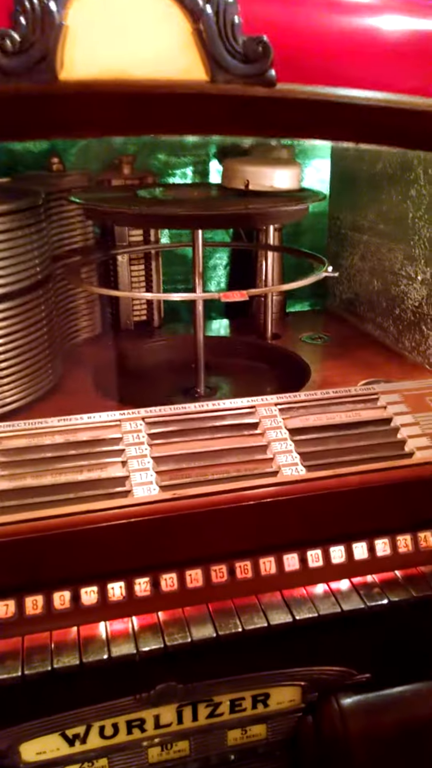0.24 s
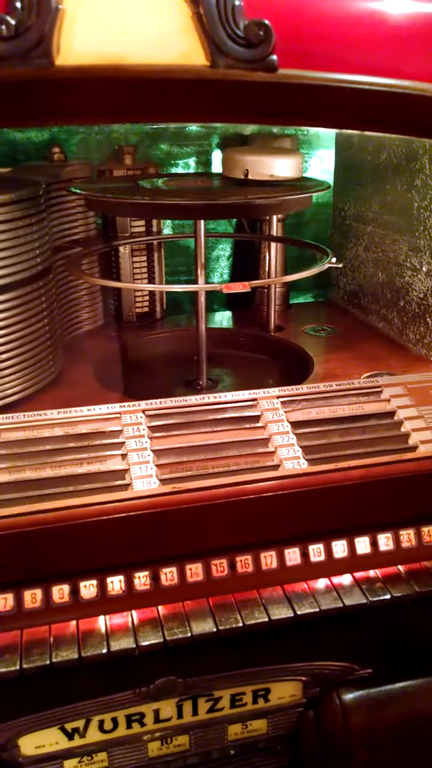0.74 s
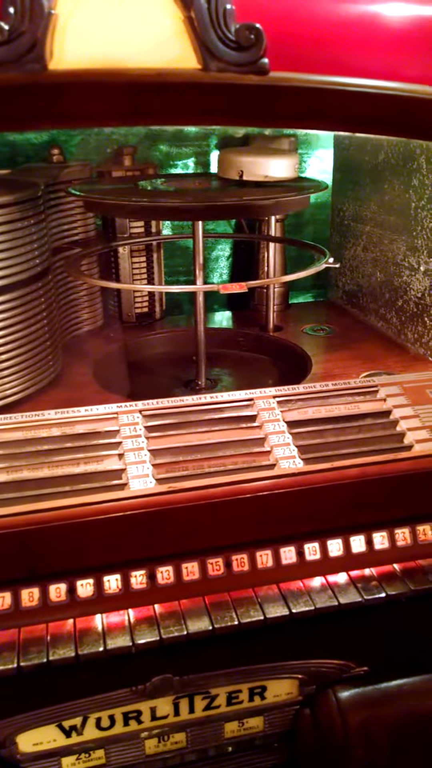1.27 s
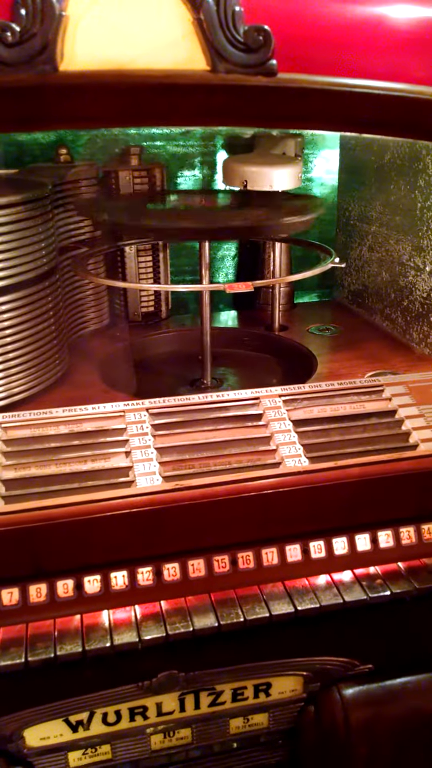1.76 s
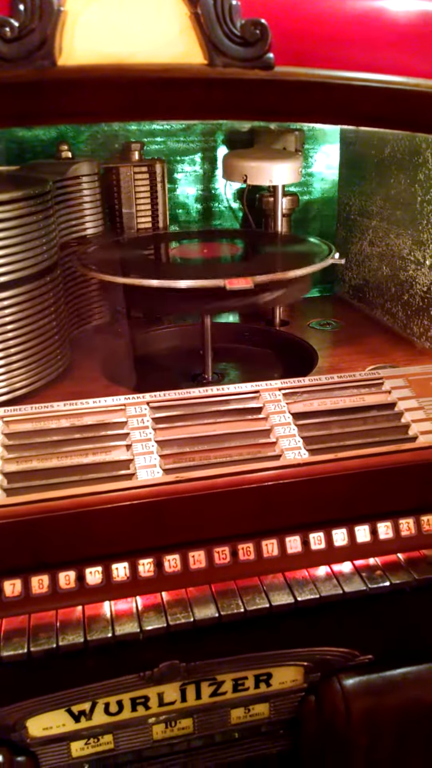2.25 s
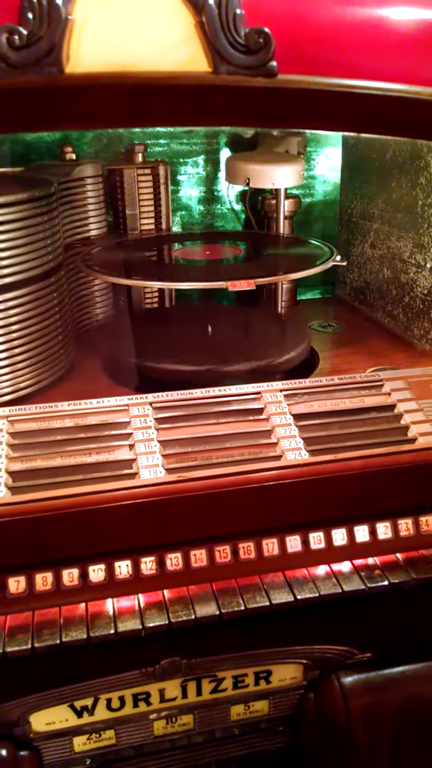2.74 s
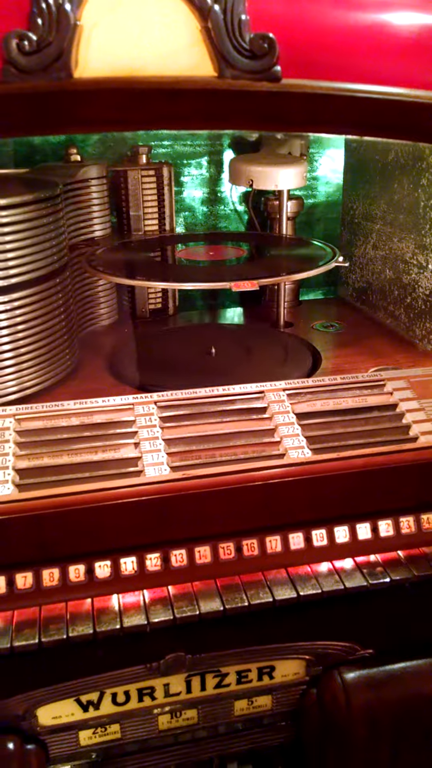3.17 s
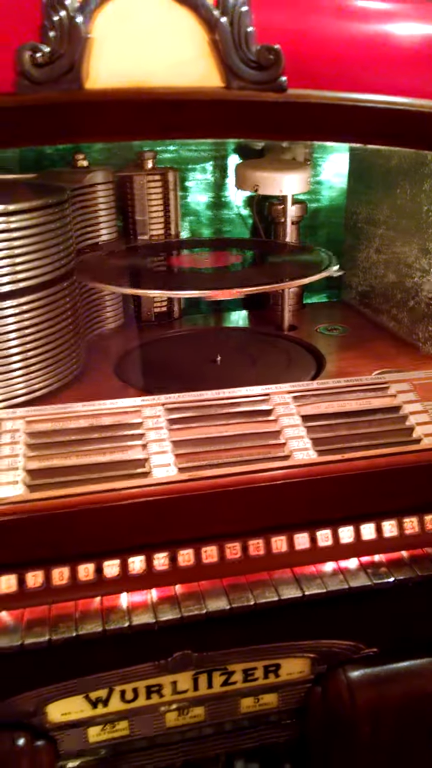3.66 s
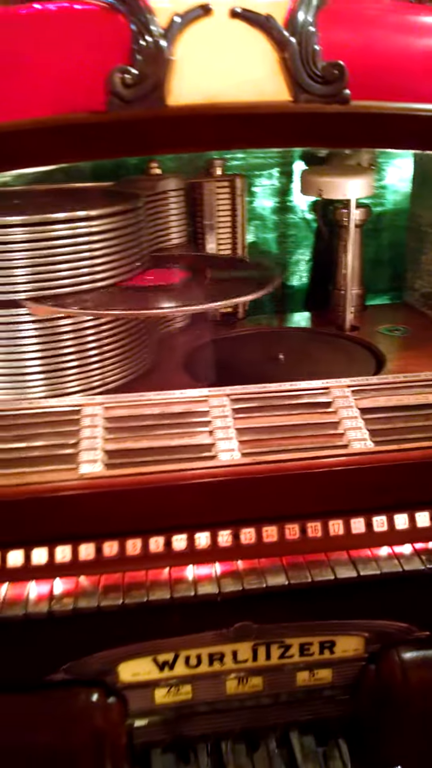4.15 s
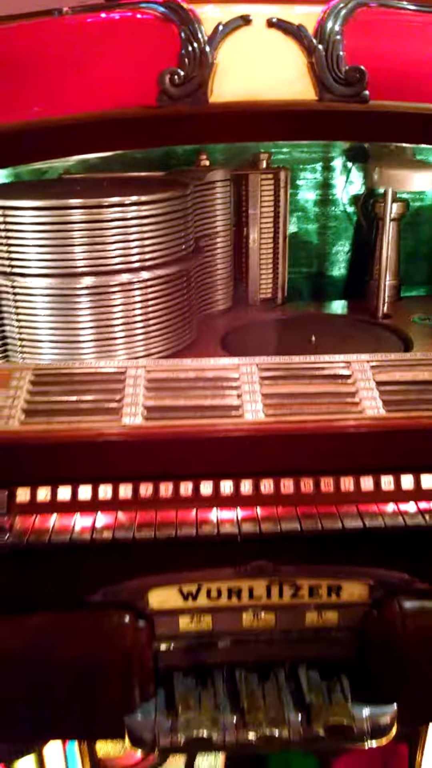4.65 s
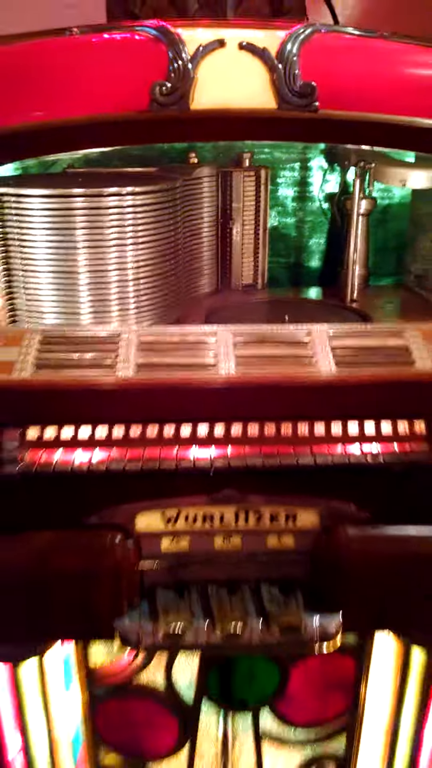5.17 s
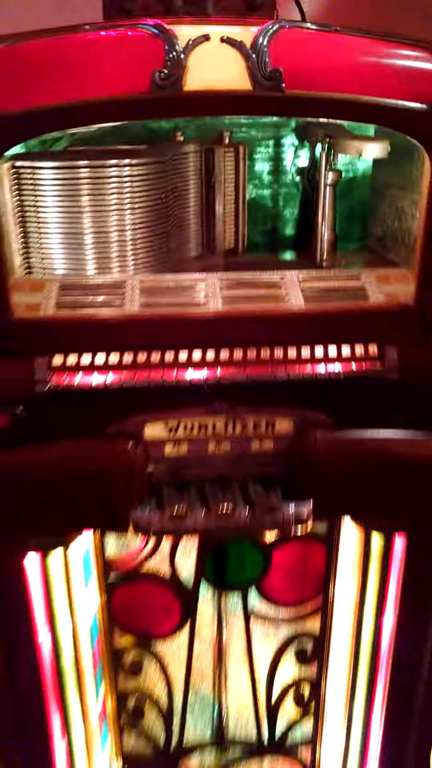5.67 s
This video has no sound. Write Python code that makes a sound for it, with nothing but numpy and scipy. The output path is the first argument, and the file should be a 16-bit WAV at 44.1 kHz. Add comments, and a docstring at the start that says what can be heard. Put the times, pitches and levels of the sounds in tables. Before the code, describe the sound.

A jukebox puts a record away: crackly groove noise stops after deep thumps, leaving motor hum, gear whirr, small metallic clicks and tray knocks.

```python
"""A jukebox changes its record close by: levers and latches drag, snap and ring as damped steel modes,
and the record tray knocks and rubs as cams swing it back into the stack.
Resonant noise is the needle in the run-out groove; its jolts boom in the loudspeaker until the turntable sinks away.
Behind lie mains harmonics, a turntable drone that beats with them, the gear whirr and a faint bearing squeak.
The hand-held stereo microphone adds hiss, handling rumble and thuds; a short diffuse room follows the blows."""
import sys
import numpy as np
from scipy import signal
from scipy.fft import rfft, irfft, next_fast_len
from scipy.io import wavfile
from scipy.ndimage import map_coordinates

SR = 44100
rng = np.random.default_rng(int(sys.argv[2]) if len(sys.argv) > 2 else 0)


def dump(signal):
    """Clip the signal to [-1, 1] and save it as 16-bit WAV at the path in sys.argv[1]."""
    limited = np.clip(np.atleast_2d(signal).T, -1, 1)
    pcm = np.round(limited * 32767).astype(np.int16)
    wavfile.write(sys.argv[1], SR, pcm)


N = 260631

# Microphone and room
# jostles of the hand-held microphone: start_s, sway_db, thud_db
JOSTLES = [(0.249, -40, -53), (2.201, -32.5, -47), (4.225, -47, -44), (4.32, -37, -29.5), (4.375, -43, -36),
           (4.656, -34, -35), (4.851, -39, -43), (4.902, -46, -36.5), (4.991, -33, -33), (5.03, -35, -33.5),
           (5.09, -37, -43), (5.185, -54, -39.5), (5.24, -36.5, -50), (5.641, -52, -37),
           (5.736, -41, -37.5)]
# spectrum of a handling thud: freq_hz, density_db (per Hz, relative)
THUD_SPECTRUM = [(25, -16), (55, -1), (95, 4.0), (180, -10), (450, -45.0)]
# left-right likeness of a handling thud: freq_hz, likeness (-1 to 1, beyond is clipped)
THUD_ALIKE = [(30, -1.0), (70, -1.3), (130, -0.34)]
# spectrum of handling rumble: freq_hz, density_db (per Hz, relative)
RUMBLE_SPECTRUM = [(15, -11), (30, 3), (60, -5.5), (100, -12), (200, -14.5), (600, -75)]
# left-right likeness of handling rumble: freq_hz, likeness (-1 to 1)
RUMBLE_ALIKE = [(30, -0.76), (55, -0.87), (90, -0.56)]
# spectrum of microphone hiss: freq_hz, density_db (per Hz, relative)
HISS_SPECTRUM = [(100, -21), (2000, -10), (5000, -3), (9500, 3.5), (12000, 1), (14300, 9), (15500, -0.5)]
# left-right likeness of most noises: freq_hz, likeness (-1 to 1)
ALIKE = [(100, 0.56), (600, 0.72), (1200, 0.46), (2000, 0), (3500, 0.072), (6000, 0), (15000, 0)]
# stereo widener: freq_hz, share of the opposite channel taken away (0 to 1, capped in use)
CROSSFEED = [(300, 0.12), (900, 0.16), (1500, 0.61), (2300, 0.93), (2750, 1), (5200, 0.45), (7800, 0.059),
             (10400, 0.16), (15000, 0.19)]
# decay of the room: freq_hz, t60_s
ROOM_DECAY = [(100, 0.16), (600, 0.25), (2000, 0.32), (6000, 0.21), (15000, 0.089)]

# Hum and running gear
# hum of motor and amplifier: mains_multiple, left_db, right_db
HUM_HARMONICS = [(1, -59, -56.5), (2, -47, -46), (3, -53, -49.5), (4, -66, -51), (5, -53, -57),
                 (7, -62, -55.5), (8, -60.5, -71), (10, -94, -103), (13, -82, -92), (15, -63, -93),
                 (18, -68, -75), (20, -69, -105)]
# amplifier buzz, muted with the needle: mains_multiple, level_db
BUZZ_HARMONICS = [(1, -76), (3, -81), (4, -66), (5, -64)]
# faint electrical whine: pitch_hz, level_db
WHINE_TONES = [(9650, -76), (14223, -81), (14463, -101)]
# drone of the free-running turntable: time_s, pitch_hz
TURNTABLE_PITCH = [(1.9, 129.03), (2.25, 137.04), (2.6, 136.42), (3.3, 125.72), (3.7, 129.68),
                   (4.4, 135.44), (4.95, 134.66), (5.4, 138.21), (5.9, 137.87)]
# spectrum of the gear whirr ahead of the panels: freq_hz, density_db (per Hz, relative)
WHIRR_SPECTRUM = [(40, -12), (90, -5.5), (200, -3.5), (350, -7), (620, -12), (1000, -15.5), (1450, -26),
                  (1950, -19), (2400, -32), (3000, -20.5), (3700, -27), (4600, -26.5), (9500, -28.5),
                  (15000, -35.5)]
# cabinet panels that the gear excites: freq_hz, width_hz, gain_db
PANELS = [(606, 134, 9), (760, 6.5, 14.5), (910, 6.1, 1), (1265, 140, 3.5), (1660, 23, 8.5),
          (1930, 57, 1.5)]
# cam strokes that load the gear: middle_s, length_s, rise_db
CAM_STROKES = [(1.225, 1.13, 4), (2.306, 0.85, 2), (3.495, 0.95, 1.5), (4.92, 0.36, 2)]
# faint squeaks of a dry bearing: peak_s, level_db
SQUEAKS = [(3.55, -68), (5.36, -70)]

# Needle and loudspeaker
# spectrum of needle noise ahead of the pickup: freq_hz, density_db (per Hz, relative)
NEEDLE_SPECTRUM = [(100, 0.5), (300, -8), (600, -5.5), (1000, -10), (1650, -6.5), (2200, -14), (3000, -8),
                   (3650, -7), (4400, -14), (5600, -6), (6800, -12), (8000, -22), (9500, -16.5),
                   (13000, -34)]
# resonances that colour needle noise: freq_hz, width_hz, gain_db
PICKUP = [(596, 15, 8.5), (988, 65, 10.5), (1374, 36, 8.5), (1658, 50, 6), (3450, 240, 2), (3700, 370, 7.5),
          (5450, 370, 8.5), (5650, 100, 3), (6600, 180, 1), (7080, 180, 7.5)]
# needle noise bands that waver independently: freq_hz, width_hz, depth_db (scales a random curve)
WAVERING_BANDS = [(1400, 900, 1), (3800, 800, 1.04), (5650, 1100, 0.8)]
# needle jolts heard through the loudspeaker: start_s, level_db, thump_db
BUMPS = [(0.92, -43.5, -38), (0.968, -53, -54), (1.263, -36.5, -37), (1.486, -27, -34), (1.501, -32, -26.5),
         (1.6695, -23, -18), (1.718, -38, -39), (1.735, -55, -32), (1.777, -52, -51)]
# spectrum of a jolt's thud: freq_hz, density_db (per Hz, relative)
JOLT_SPECTRUM = [(40, -42), (130, -13), (230, 4), (420, 0), (650, -4), (950, -15), (1600, -16), (2300, -24),
                 (8000, -63)]
# left-right likeness of a jolt's thud: freq_hz, likeness (-1 to 1)
JOLT_ALIKE = [(100, 1.0), (2000, 0.44)]
# loudspeaker in its cabinet: freq_hz, motion_db (relative), t60_s
SPEAKER_MODES = [(80, -6.5, 0.32), (91.8, 8, 0.11), (138, 4, 0.038), (177, -12, 0.11), (348, -32, 0.12)]
# loudspeaker box: freq_hz, motion_db (relative), t60_s
BOX_MODES = [(188.7, 5, 0.12), (252, -6.5, 0.048), (334, -7.5, 0.1), (402, -6.5, 0.086), (479, -12, 0.1),
             (596, -14, .045), (1384, -32, .04), (1747, -36, 0.1)]

# Tray, levers and latches
# dull knocks of tray and carrier: start_s, level_db, tilt_db (brightness per octave)
KNOCKS = [(1.644, -33.5, -10), (1.659, -33, 7), (4.649, -47, 5), (4.697, -56, 7), (4.782, -50, 21),
          (4.792, -49, 15), (4.842, -44.5, 17), (4.865, -49, 12), (4.907, -50, 10), (4.931, -50, 8),
          (4.973, -53, 14), (4.984, -46, 5), (4.995, -53, 4), (5.516, -46, -5), (5.528, -41, -18),
          (5.546, -48, -12)]
# tray rubs as it settles in the stack: peak_s (greatest pressure), level_db
RUBS = [(4.8, -57), (4.855, -50), (4.92, -63), (4.99, -57), (5.521, -47.5)]
# spectrum of the rub: freq_hz, density_db (per Hz, relative)
SCRAPE_SPECTRUM = [(80, -23), (200, -3), (400, 7), (650, -13), (1300, -9), (2200, -7), (5000, -13),
                   (15000, -25)]
# record tray: freq_hz, level_db (relative, before tilt), t60_s (before any further damping)
TRAY_MODES = [(570, 0, 0.1), (616, 3, 0.12), (708, -2, 0.088), (794, -9.5, 0.09), (940, -17, 0.061),
              (1184, -9.5, 0.057), (1375, -19, 0.076), (1740, -30.5, 0.1)]
# the tray's steel hoop takes the record, then is jerked aside: start_s, level_db, tilt_db (per octave)
HOOP_STRIKES = [(2.287, -42, 2.5), (2.298, -51, -9), (3.396, -47.5, 1)]
# the hoop: freq_hz, level_db (relative, before tilt), t60_s
HOOP_MODES = [(870, -9, .08), (1000, 2, 0.095), (1650, 1.5, 0.086), (1890, -2, 0.055), (3900, -23, 0.08),
              (5870, 2, 0.031)]
# a small steel latch seats: start_s, level_db, tilt_db (per octave)
LATCH_STRIKES = [(3.718, -55, 8), (4.682, -41, 0), (5.516, -54.5, 2)]
# the latch: freq_hz, level_db (relative, before tilt), t60_s
LATCH_MODES = [(815, -4, 0.13), (1700, -1.5, 0.035), (1917, 2.5, 0.062), (1980, 0.5, .03)]
# the trip lever snaps over and rebounds: start_s, level_db, tilt_db (per octave)
TRIP_STRIKES = [(1.3375, -26.5, 3.5), (1.3417, -30, -2.5)]
# the trip lever: freq_hz, level_db (relative, before tilt), t60_s
TRIP_MODES = [(1394, -4, 0.043), (1535, -13, .13), (1634, -7, .085), (1760, -8, 0.14), (1926, 2, 0.04),
              (2200, -3, .045), (2780, -6, 0.071), (4170, -17, 0.035), (6480, -7, 0.038)]
# levers and latches drag, then snap home: start_s, click_db, steel_db, cabinet_db, drag_s
CLACKS = [(1.11, -44, -60, -50, 0.0025), (1.12, -37, -38, -36.5, 0.0057), (1.128, -41, -38, -41, 0.003),
          (1.197, -43, -65, -45, 0.024), (1.3375, -30, -34.5, -29, 0.001), (1.635, -50, -43.5, -38, 0.0073),
          (1.644, -33.5, -44, -41, .004), (1.719, -68, -44.5, -47, 0.0071), (2.263, -49, -63, -43, 0),
          (2.274, -42, -63, -53, 0.0099), (2.283, -46, -65, -47, 0.02), (2.287, -40.5, -49, -43, 0),
          (2.298, -53, -47, -49, 0), (2.355, -43, -51, -45, 0.0038), (2.366, -59, -51, -51, 0),
          (3.391, -41, -49, -48, 0.00085), (3.396, -45.5, -53, -42, 0.0052),
          (3.718, -53, -76, -51, 0.00085), (4.532, -48, -58, -73, 0.0048), (4.634, -50.5, -58, -53, 0.0046),
          (4.682, -52, -50, -45, 0), (4.771, -36, -71, -53, 0), (4.779, -37, -62, -47, 0.012),
          (4.833, -37, -50, -41.5, 0.0077), (4.837, -42.5, -51, -48, 0.0097),
          (4.846, -55, -51, -43, 0.0065)]
# steel levers: freq_hz, level_db (relative), t60_s (before further damping)
STEEL_MODES = [(880, -5, 0.23), (1100, -6, .12), (1417, 0.5, 0.053), (1546, -3, 0.12), (1630, -0.5, 0.07),
               (1720, -3, 0.068), (1934, 5, 0.036), (2105, 1.5, 0.054), (2340, 0, 0.083),
               (2740, 3.5, 0.045), (5770, -2.5, 0.028), (6270, -3, 0.034)]
# spectrum of the contact click: freq_hz, density_db (per Hz, relative)
CLICK_SPECTRUM = [(800, -43), (2200, -0.5), (3200, -0.5), (4500, 0), (5700, 2.5), (6500, 3.5), (7600, 1),
                  (9300, 1), (11500, -5.5), (15000, -4)]
# spectrum of the wooden cabinet knock: freq_hz, density_db (per Hz, relative)
CABINET_SPECTRUM = [(25, -20), (60, 5), (120, 2.5), (330, 5), (650, 4), (950, -0.5), (1500, -13.5),
                    (3000, -52), (8000, -80)]

# Settings: _DB levels, _S and _T60 seconds, _HZ hertz
RUMBLE_DB, SWAY_T60 = -49, 0.3  # rumble at rest; its swell around a jostle
PORT_DELAY_S, TOP_HZ = .000386, 15650  # widener delay; upper limit of the band
MAINS_HZ = 60
MUTE_S = 1.8  # amplifier silent from here
HUM_FADE_S, HUM_FADE_DB_PER_S = 4.98, 3.5  # the hum grows fainter from here
MOTOR_HZ, MOTOR_DB, MOTOR_FADE_S, MOTOR_T60 = 1935, -68, 3.35, 4.3  # motor whine and its fade
DRONE_DB, DRONE_DB_PER_HZ, DRONE_RISE_S = -49, 0.2, 0.33  # level at mean pitch; faster is louder
GEAR_DB = -49  # without load
SQUEAK_HZ, SQUEAK_ARCH_HZ, ARCH_S, SQUEAK_T60 = 11350, 880, .07, 1.2
GROOVE_DB, GROOVE_FADE_DB_PER_S = -40, 4.5  # level at the start; fades as the needle runs inward
TURN_SWING_DB, TURN_PEAK_S, TURNS_PER_S = 0.7, 0.4, 78 / 60  # swell once a turn
LIFT_S, LIFT_T60 = 1.77, 0.19  # the needle leaves the groove
BUMP_T60, THUMP_DELAY_S = 0.087, 0.00677
RASP_DB, RASP_GROWS = -41.5, 0.37  # treble rasp of an average jolt; dB more for each dB of jolt
RUB_RISE_T60, RUB_FALL_T60 = 0.58, 0.37
CLACK_T60, STEEL_T60 = 0.083, 0.15  # click decay; extra damping of the levers
CLACK_RISE_S, FIRM_DB = 0.00063, -37  # closing time; steel struck harder than this closes faster
DRAG_DB = -1  # drag relative to its click
CRACK_DB, CRACK_T60 = -5.5, 0.0086  # first instant of a contact, relative to its click


def amp(db):
    """Amplitude of a level in decibels."""
    return 10 ** (np.asarray(db) / 20)


def unit(x):
    """Scales a signal to rms 1."""
    return x / np.sqrt(np.mean(x ** 2) + 1e-20)


def blow(x):
    """Scales a hit to rms 1 over its first 30 ms."""
    return x / np.sqrt(np.mean(x[..., :int(.03 * SR)] ** 2) + 1e-20)


def pan(db):
    """Left and right gains for a left-right level difference."""
    return amp([[db / 2], [-db / 2]])


def along(points, hz):
    """Reads (freq_hz, value) points along a log frequency axis."""
    freq, value = np.transpose(points)
    return np.interp(np.log(hz + 1), np.log(freq), value)


def since(s):
    """Seconds since the moment s, for each sample."""
    return np.arange(N) / SR - s


def fade(t, t60):
    """An exponential decay of 60 dB in t60 seconds, never quicker than 5 ms."""
    return np.exp(-np.log(1000) * t / np.maximum(t60, .005))


def swell(s, rise_t60, fall_t60):
    """An envelope that grows to 1 at s and dies away."""
    t = since(s)
    return fade(np.abs(t), np.where(t < 0, rise_t60, fall_t60))


def wobble(rate):
    """A smooth random curve, rate knots a second."""
    knots = rng.standard_normal(int(N * rate / SR) + 4)
    return map_coordinates(knots, [np.arange(N) * rate / SR])


def sine(hz):
    """A sine of rms 1 that follows a pitch curve in hertz."""
    return np.sqrt(2) * np.sin(2 * np.pi * np.cumsum(hz) / SR)


def filtered(x, response):
    """Multiplies the spectrum of x by a response of frequency."""
    n = x.shape[-1]
    m = next_fast_len(n + 8192)
    return irfft(rfft(x, m) * response(np.fft.rfftfreq(m, 1 / SR)), m)[..., :n]


def noise(spectrum, size=N, alike=ALIKE):
    """Coloured stereo noise of rms 1; the mid-side balance sets the left-right likeness."""
    def response(hz):
        angle = np.arccos(np.clip(along(alike, hz), -1, 1)) / 2
        return amp(along(spectrum, hz)) * [np.cos(angle), np.sin(angle)]

    mid, side = filtered(rng.standard_normal((2, size)), response)
    return unit(np.array([mid + side, mid - side]))


def peaks(rows, hz):
    """Gain of a set of (freq_hz, width_hz, gain_db) resonances."""
    return amp(sum(db / (1 + (2 * (hz - centre) / width) ** 2) for centre, width, db in rows))


def enclosed(x, depth_db, spacing_hz=38):
    """Dense standing waves of the cabinet ripple the spectrum above the low mids."""
    knots = rng.standard_normal(int(SR / spacing_hz) + 4)

    def response(hz):
        ripple = map_coordinates(knots, [hz / spacing_hz])
        return amp(depth_db * hz / (hz + 1200) * ripple)

    return filtered(x, response)


def ring(modes, t, scatter_db):
    """Damped modes, struck at new strengths and reaching each microphone port differently."""
    hz, db, t60 = np.transpose(modes)[:, :, None]
    strength = amp(db + scatter_db * rng.standard_normal((2, len(modes), 1)))
    phase = rng.uniform(0, 2 * np.pi, (len(modes), 1)) + .5 * rng.standard_normal((2, len(modes), 1))
    return np.sum(strength * fade(t, t60) * np.sin(2 * np.pi * hz * t + phase), axis=1)


def tilted(modes, tilt_db):
    """Favours the upper modes by tilt_db an octave above the first."""
    return [(hz, db + tilt_db * np.log2(hz / modes[0][0]), t60) for hz, db, t60 in modes]


def add(track, s, x):
    """Mixes x into the track at s seconds."""
    part = track[:, max(round(s * SR), 0):][:, :x.shape[-1]]
    part += x[..., :part.shape[-1]]


def floor():
    """Handling rumble, swelling at each jostle and nearly opposite at the two ports, over microphone hiss."""
    sway = amp(RUMBLE_DB) + sum(amp(db) * swell(s, SWAY_T60, SWAY_T60) for s, db, _ in JOSTLES)
    rumble = sway * amp(0.69 * wobble(25)) * noise(RUMBLE_SPECTRUM, alike=RUMBLE_ALIKE)
    hiss = amp(-56.0) * noise(HISS_SPECTRUM)
    return pan(2.0) * rumble + pan(2.4) * hiss


def jostles(t60=0.19, rise_s=0.003):
    """Each jostle thuds dully in the microphone as a short burst of bass noise."""
    track, t = np.zeros((2, N)), np.arange(SR // 3) / SR
    envelope = (1 - np.exp(-t / rise_s)) * fade(t, t60)
    for s, _, thud_db in JOSTLES:
        thud = noise(THUD_SPECTRUM, size=len(t), alike=THUD_ALIKE)
        add(track, s, amp(thud_db) * blow(thud * envelope))
    return track


def room(x):
    """A diffuse tail in which each frequency dies at its own speed."""
    hz, t, z = signal.stft(rng.standard_normal((2, SR // 2)), SR, nperseg=256)
    decay = fade(t, along(ROOM_DECAY, hz)[:, None])
    tail = signal.istft(z * decay, SR, nperseg=256)[1]
    tail = np.pad(tail / np.linalg.norm(tail[0]), ((0, 0), (int(.008 * SR), 0)))  # starts 8 ms late
    return signal.fftconvolve(x, tail, axes=1)[:, :N]


def hum(waver_db=1.5, flutter_db=1.3):
    """Mains harmonics from motor and amplifier, each slightly unsteady, and a faint high whine."""
    t = since(0)

    def tone(hz):
        unsteady_db = waver_db * wobble(3.76) + flutter_db * min(hz / 300, 1) * wobble(21.97)
        return np.sqrt(2) * amp(unsteady_db) * np.sin(2 * np.pi * hz * t)

    motor = sum(amp([[left], [right]]) * tone(k * MAINS_HZ) for k, left, right in HUM_HARMONICS)
    live = np.clip((MUTE_S - t) / .02, 0, 1)
    amplifier = live * sum(amp(db) * tone(k * MAINS_HZ) for k, db in BUZZ_HARMONICS)
    hum_fade = amp(-HUM_FADE_DB_PER_S * np.maximum(since(HUM_FADE_S), 0))
    whine = sum(amp(db) * tone(hz) for hz, db in WHINE_TONES)
    return hum_fade * motor + amplifier + whine


def motor_whine(waver_db=3.0):
    """A thin, unsteady motor tone that dies down once the turntable has sunk."""
    decay = fade(np.maximum(since(MOTOR_FADE_S), 0), MOTOR_T60)
    return amp(MOTOR_DB + waver_db * wobble(21.93)) * decay * sine(MOTOR_HZ + 18 * wobble(90))


def turntable():
    """A drone just above twice the mains frequency, so that it throbs against the hum."""
    time_s, pitch_hz = np.transpose(TURNTABLE_PITCH)
    hz = np.interp(since(0), time_s, pitch_hz)
    rise = np.clip(since(time_s[0]) / DRONE_RISE_S, 0, 1)
    level = amp(DRONE_DB + DRONE_DB_PER_HZ * (hz - hz.mean()))
    return pan(-1.8) * level * rise * sine(hz)


def gear(buzz=0.036):
    """The gear train whirrs through cabinet panels, pulsing with motor torque and louder under load."""
    load_db = sum(rise * np.cos(np.pi * np.clip(since(s) / length, -.5, .5))
                  for s, length, rise in CAM_STROKES)
    torque = 1 + buzz * np.sin(2 * np.pi * 2 * MAINS_HZ * since(0))
    whirr = filtered(noise(WHIRR_SPECTRUM), lambda hz: peaks(PANELS, hz))
    whirr = unit(enclosed(whirr, depth_db=2.8))
    return amp(GEAR_DB + load_db + 0.76 * wobble(8) + 1.27 * wobble(45)) * torque * whirr


def squeak(jitter_hz=35):
    """A bearing sings thinly, its pitch arching as the load passes."""
    arch = sum(np.exp(-(since(s) / ARCH_S) ** 2) for s, _ in SQUEAKS)
    hz = SQUEAK_HZ + SQUEAK_ARCH_HZ * arch + jitter_hz * wobble(120)
    level = sum(amp(db) * swell(s, SQUEAK_T60, SQUEAK_T60) for s, db in SQUEAKS)
    return level * amp(2 * wobble(30)) * sine(hz)


def wavering_bands(x, rate=70):
    """Three bands of the needle noise waver in level, each by its own random curve."""
    def band(centre, width):
        return filtered(x, lambda hz: np.exp(-(2 * (hz - centre) / width) ** 2))

    return x + sum((amp(db * wobble(rate)) - 1) * band(centre, width)
                   for centre, width, db in WAVERING_BANDS)


def groove(crackle_db=0.5, flutter_db=0.37, tick_rate=160, tick_size=2.6):
    """Grainy surface noise and dust ticks under the needle, coloured by the pickup's resonances."""
    turn_db = TURN_SWING_DB * np.cos(2 * np.pi * TURNS_PER_S * since(TURN_PEAK_S))
    db = GROOVE_DB - GROOVE_FADE_DB_PER_S * since(0) + turn_db + flutter_db * wobble(30.85)
    contact = fade(np.maximum(since(LIFT_S), 0), LIFT_T60)
    grit = rng.standard_normal((2, N)) * amp(crackle_db * wobble(300))
    ticks = (rng.random(N) < tick_rate / SR) * rng.exponential(1, N)
    grit[0] += tick_size * ticks  # the mid channel only
    mid, side = filtered(grit, lambda hz: amp(along(NEEDLE_SPECTRUM, hz)) * peaks(PICKUP, hz))
    hiss = wavering_bands(enclosed(np.array([mid + side, mid - side]), depth_db=4.5))
    return pan(3.6) * amp(db) * contact * unit(hiss)


def bumps(attack_s=0.0012, swell_s=0.0043, box_db=-1, box_rise_s=0.00072, thud_db=-5):
    """A needle jolt rasps in the loudspeaker and rings its box; the cone then booms at its bass resonance."""
    track, t = np.zeros((2, N)), np.arange(SR // 3) / SR

    def radiated(modes, rise_s):
        motion = sum(amp(db) * fade(t, t60) * np.sin(2 * np.pi * hz * t) for hz, db, t60 in modes)
        return blow(np.gradient(motion * (1 - np.exp(-t / rise_s))))  # the motion's rate of change

    thump = radiated(SPEAKER_MODES, swell_s)
    box = amp(box_db) * radiated(BOX_MODES, box_rise_s)
    burst = (1 - np.exp(-t / attack_s)) * fade(t, BUMP_T60)
    average_db = np.mean([db for _, db, _ in BUMPS])
    for s, db, thump_db in BUMPS:
        thud = amp(thud_db) * blow(noise(JOLT_SPECTRUM, size=len(t), alike=JOLT_ALIKE) * burst)
        scratch = filtered(noise(NEEDLE_SPECTRUM, size=len(t)), lambda hz: peaks(PICKUP, hz))
        rasp = amp(RASP_DB + RASP_GROWS * (db - average_db)) * blow(scratch * burst)
        add(track, s, pan(-4.5) * amp(db) * (thud + box) + rasp)
        add(track, s + THUMP_DELAY_S, pan(-6.5) * amp(thump_db) * thump)
    return track


def slide(chatter_db=3.5, rattle_db=-3.5, rattle_rate=70, rattle_tilt_db=10, held_t60=0.059):
    """The tray rubs unevenly on its guide and rattles against its neighbours, which damp it."""
    pressure = sum(amp(db) * swell(s, RUB_RISE_T60, RUB_FALL_T60) for s, db in RUBS)
    rub = amp(chatter_db * wobble(70)) * noise(SCRAPE_SPECTRUM)
    t = np.arange(SR // 8) / SR
    taps = (rng.random((1, N)) < rattle_rate / SR) * rng.standard_normal((1, N))
    held_tray = ring(tilted(TRAY_MODES, rattle_tilt_db), t, scatter_db=-3.0) * fade(t, held_t60)
    rattle = signal.fftconvolve(taps, held_tray, axes=1)[:, :N]
    return pan(2.4) * pressure * (rub + amp(rattle_db) * unit(rattle))


def struck(strikes, modes, length, attack_s, rattle_db, rattle_rate, pan_db):
    """Blows ring a part's modes with an uneven rattle; tilt favours the upper modes."""
    track, t = np.zeros((2, N)), np.arange(length) / SR
    for s, db, tilt_db in strikes:
        rattle = amp(rattle_db * wobble(rattle_rate)[:len(t)])
        tone = ring(tilted(modes, tilt_db), t, scatter_db=1.0) * rattle * (1 - np.exp(-t / attack_s))
        add(track, s, pan(pan_db) * amp(db) * blow(tone))
    return track


def knocks():
    """The tray rings briefly, rattling in its loose seat."""
    return struck(KNOCKS, TRAY_MODES, SR // 3, attack_s=0.00062, rattle_db=2, rattle_rate=280, pan_db=1.1)


def clinks(strikes, modes, rattle_db):
    """A loose steel part is struck and rings briefly; its tilt sets how bright the contact is."""
    return struck(strikes, modes, SR // 4, attack_s=0.00012, rattle_db=rattle_db, rattle_rate=276, pan_db=3.4)


def clacks(cabinet_t60=0.23, rattle_db=2):
    """Each contact drags, clicks, rings the levers and knocks the wooden cabinet."""
    track, t = np.zeros((2, N)), np.arange(SR // 3) / SR
    click_decay = fade(t, CLACK_T60) + amp(CRACK_DB) * fade(t, CRACK_T60)
    for s, click_db, steel_db, cabinet_db, drag_s in CLACKS:
        rise_s = CLACK_RISE_S * min(1, np.sqrt(amp(FIRM_DB - steel_db)))
        attack = 1 - np.exp(-t / rise_s)
        rattle = amp(rattle_db * wobble(320)[:len(t)])  # loose joints chatter as they close
        wood = noise(CABINET_SPECTRUM, size=len(t)) * attack * fade(t, cabinet_t60)
        steel = ring(STEEL_MODES, t, scatter_db=3.5) * attack * rattle * fade(t, STEEL_T60)
        click = noise(CLICK_SPECTRUM, size=len(t)) * attack * rattle * click_decay
        metal = amp(steel_db) * blow(steel) + amp(click_db) * blow(click)
        scuff = amp(click_db + DRAG_DB) * noise(CLICK_SPECTRUM, size=len(t)) * rattle * (t < drag_s)
        add(track, s, pan(0.44) * amp(cabinet_db) * blow(wood) + pan(3.3) * metal)
        add(track, s - drag_s, pan(5.2) * scuff)
    return track


def scene():
    """Levers, latch, tray and needle jolts sound in the room, over the running machine."""
    levers = clacks() + knocks() + clinks(HOOP_STRIKES, HOOP_MODES, rattle_db=7.0)
    latch = clinks(LATCH_STRIKES, LATCH_MODES, rattle_db=1.0)
    latch = latch + clinks(TRIP_STRIKES, TRIP_MODES, rattle_db=3.0)
    needle = bumps()
    echo = room(amp(-11.5) * levers + amp(-14.5) * latch + amp(-11.5) * needle)
    machine = hum() + motor_whine() + turntable() + gear() + squeak() + slide() + groove()
    return floor() + jostles() + machine + echo + needle + latch + levers


def record(dry):
    """The recorder widens the stereo by subtracting a delayed opposite channel, then limits the band."""
    def share(hz):
        return np.clip(along(CROSSFEED, hz), 0, .95)

    opposite = filtered(dry[::-1], lambda hz: share(hz) * np.exp(-2j * np.pi * hz * PORT_DELAY_S))
    # the division makes up for the power that the subtraction adds
    return filtered(dry - opposite, lambda hz: (hz < TOP_HZ) / np.sqrt(1 + share(hz) ** 2))


dry = scene()
out = record(dry)
dump(out)
```